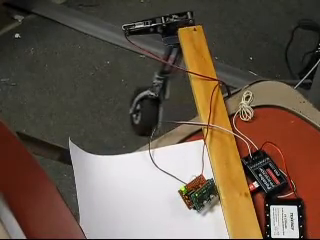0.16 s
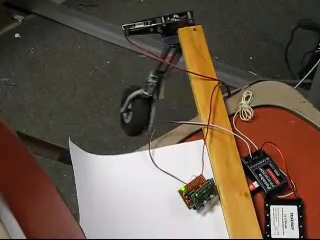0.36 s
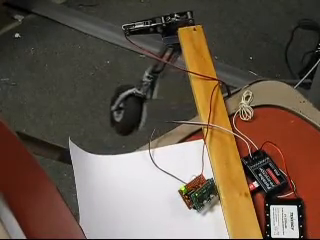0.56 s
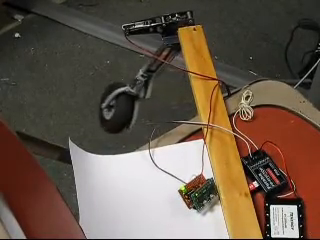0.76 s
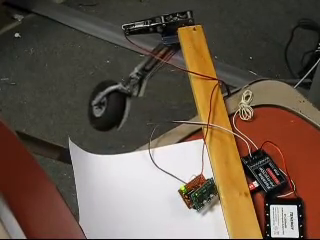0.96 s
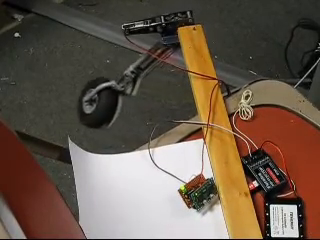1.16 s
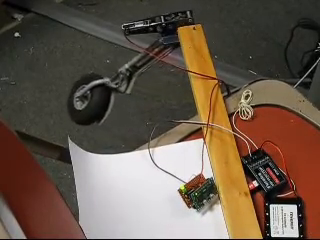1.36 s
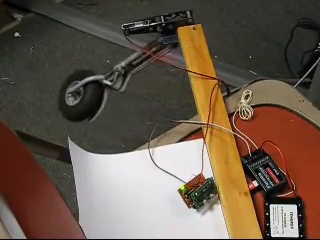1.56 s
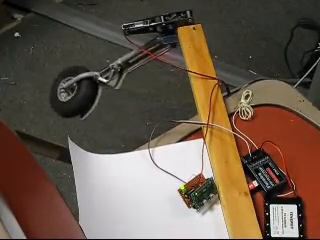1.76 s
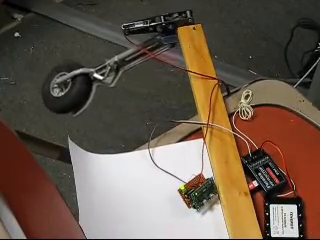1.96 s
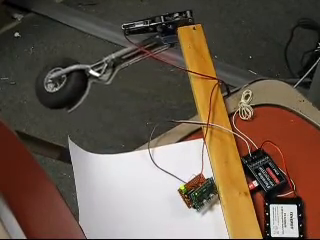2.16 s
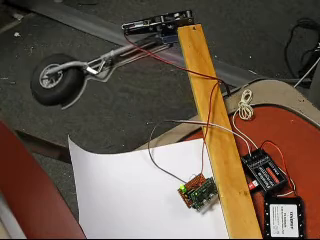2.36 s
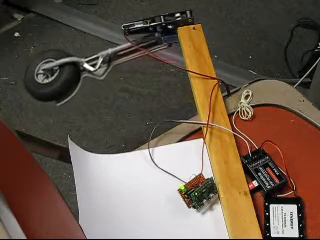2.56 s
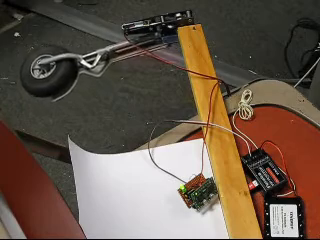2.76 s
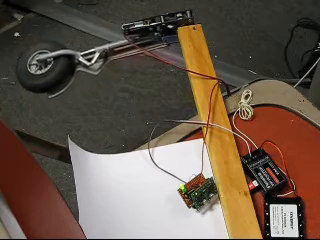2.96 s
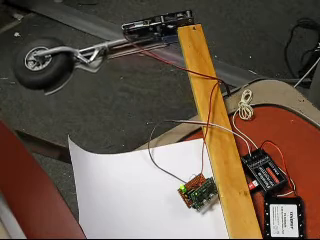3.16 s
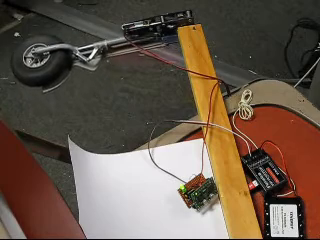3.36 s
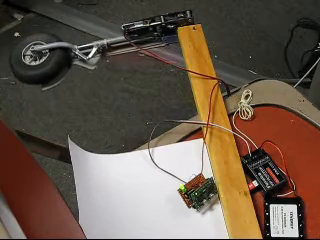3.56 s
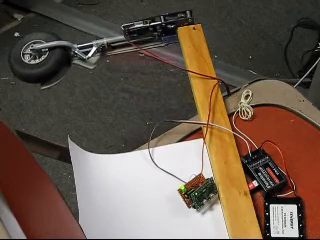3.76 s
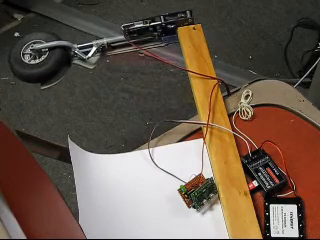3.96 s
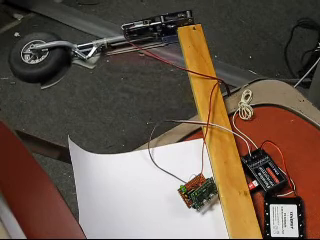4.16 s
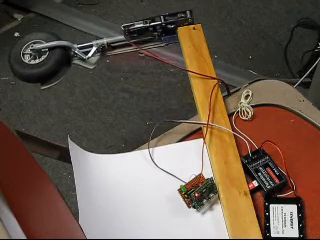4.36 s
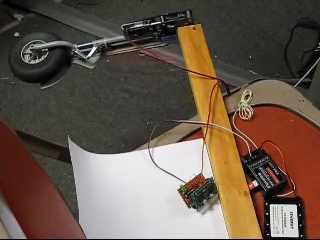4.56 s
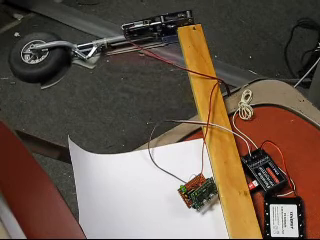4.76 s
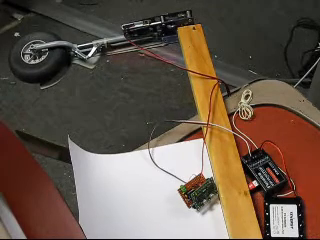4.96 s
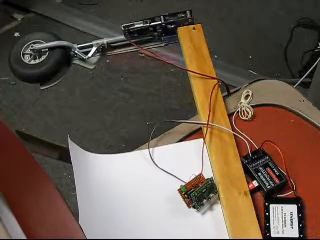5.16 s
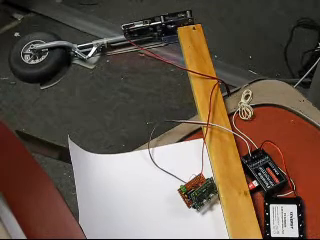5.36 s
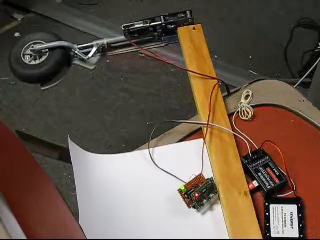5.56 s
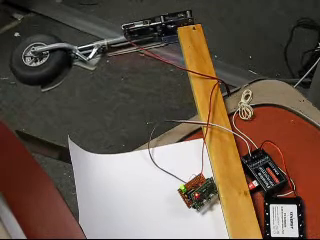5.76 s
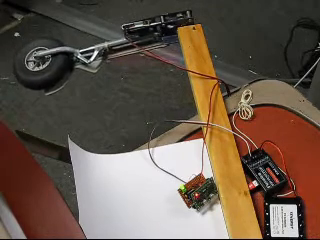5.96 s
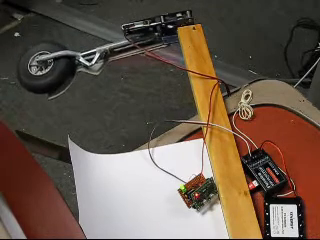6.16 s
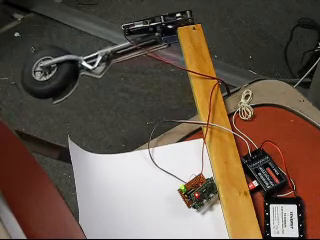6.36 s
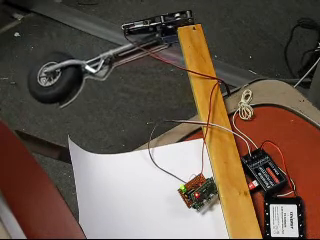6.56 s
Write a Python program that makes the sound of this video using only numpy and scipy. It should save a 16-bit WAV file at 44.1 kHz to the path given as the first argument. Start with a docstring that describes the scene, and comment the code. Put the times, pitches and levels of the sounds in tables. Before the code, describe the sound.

A small geared electric motor whines and grinds steadily, stops abruptly, kicks back with a clack, rests with faint ticks, then whirs again.

```python
"""A small geared electric motor winds a wheel strut up, stalls at the end stop, kicks back once, rests, winds it down.
Tooth and shaft tones follow one speed curve; rubbing noise throbs once a turn and rings housing, frame and can.
The rig ticks from the kick back on: bright cracks, ringing strut and plank.
Behind it a quiet workshop: room air, a far drone, mains hum. One close microphone, alike in both channels."""
import sys
import numpy as np
from scipy import signal
from scipy.fft import rfft, irfft, next_fast_len
from scipy.io import wavfile
from scipy.ndimage import uniform_filter1d, map_coordinates

SR = 44100
rng = np.random.default_rng(int(sys.argv[2]) if len(sys.argv) > 2 else 0)


def transcribe(signal):
    """Save signal, clipped to [-1, 1], as a 16-bit WAV file at the path in sys.argv[1]."""
    frames = np.atleast_2d(signal).T
    limited = np.clip(frames, -1, 1)
    pcm = np.round(limited * 32767).astype(np.int16)
    wavfile.write(sys.argv[1], SR, pcm)


N = 291942

TEETH = 7.417  # tooth contacts per shaft turn
REVERSE_S = 5.5  # the motor changes direction


def motor():
    """One shaft drives mesh whine, low tones, gear train, rubbing noise and housing ring."""
    mesh_hz, ring_db, grind_db, rasp_db, hiss_db, whine_db, shaft_db = controls()
    shaft = rotation(mesh_hz)
    dull_db = 17 * shaft["unsteady"]  # chattering or slowing gears carry little tone
    load_db = grind_db - dull_db
    tones = mesh_whine(shaft, whine_db, hiss_db) + can_whistle(shaft, ring_db)
    tones = tones + low_tones(shaft, shaft_db - dull_db, load_db) + gear_train(shaft, load_db)
    return tones + rubbing(shaft, grind_db, rasp_db, hiss_db) + housing_ring(shaft, ring_db)


# speed under load, raising: t/s, tooth-mesh rate f/Hz
RAISING_SPEED = [(0.0, 3647), (0.53, 3555), (0.58, 3505), (0.79, 3502), (1.32, 3376), (1.43, 3293),
                 (1.97, 3250), (2.12, 3183), (2.18, 3245), (2.27, 3194), (2.37, 3249), (2.84, 3293),
                 (3.1, 3338), (3.15, 3429), (3.39, 3490), (3.67, 3472), (3.75, 3622), (3.88, 3598)]
# speed under load, lowering: t/s, tooth-mesh rate f/Hz
LOWERING_SPEED = [(5.62, 3734), (5.66, 3696), (5.822, 3750), (5.898, 3904), (6.352, 3876), (6.522, 3777),
                  (6.62, 3776)]
# raising: t/s, control level/dB of housing ring, grind, rasp, hiss, mesh whine, shaft tone
RAISING_LEVELS = [(0, -37, -27.5, -38, -31, -35.5, -42), (.25, -29, -26, -35, -30, -30, -42.5),
                  (.52, -23.5, -27, -32, -29, -42.5, -47.5), (.65, -24, -25, -28.5, -29.5, -36.5, -42.5),
                  (.77, -23, -24, -28.5, -29, -34, -40.5), (.95, -19.5, -23, -29, -28.5, -37.5, -41),
                  (1.15, -25, -22.5, -28.5, -28, -31, -45.5), (1.35, -20.5, -23, -28, -28.5, -26.5, -37),
                  (1.55, -25, -24, -31.5, -27.5, -43, -39.5), (1.9, -23, -24, -31, -25.5, -33, -40),
                  (2.05, -17, -25.5, -30, -26, -33, -42), (2.35, -17.5, -25, -31, -27.5, -33, -42),
                  (2.55, -21, -24.5, -29.5, -29, -29.5, -44), (2.9, -16, -23.5, -28, -28, -35, -48.5),
                  (3.12, -12.5, -25, -30.5, -29.5, -38, -52.5), (3.4, -15, -24, -32, -30, -36.5, -47),
                  (3.63, -14, -23.5, -32.5, -30.5, -31.5, -44.5),
                  (3.885, -19.5, -23.5, -32.5, -28, -35, -47)]
# lowering: t/s, control level/dB of housing ring, grind, rasp, hiss, mesh whine, shaft tone
LOWERING_LEVELS = [(5.615, -21.5, -29.5, -34.5, -30, -38, -46), (5.689, -26, -27.5, -37, -33, -42, -50),
                   (5.745, -28, -30, -40, -34, -51, -47), (5.82, -19, -31.5, -42, -36.5, -46, -47.5),
                   (5.87, -42, -34.5, -47, -41, -54, -44), (5.92, -36, -30, -38.5, -35.5, -58, -43.5),
                   (6.12, -23, -28.5, -38, -34, -45, -43.5), (6.3, -17.5, -26, -37, -33, -47, -45),
                   (6.495, -21.5, -26.5, -34.5, -31.5, -41, -54.5),
                   (6.62, -12, -27.5, -35, -31.5, -40.5, -59)]
# kick back: t/s, tooth-mesh rate f/Hz, control level/dB of housing ring, grind, rasp, hiss
KICK_BACK = [(4.376, 300, -110, -110, -110, -110), (4.385, 600, -22.5, -31, -39, -36),
             (4.41, 1250, -19, -29, -32, -27), (4.426, 2257, -13, -17.5, -33.5, -26),
             (4.445, 3377, -11, -20.5, -39, -35), (4.46, 2884, -29, -24, -36.5, -46),
             (4.482, 2176, -31, -21.5, -41, -34), (4.51, 1200, -110, -110, -110, -110)]
# start downwards: t/s, tooth-mesh rate f/Hz, control level/dB of housing ring, grind, rasp, hiss
START_DOWN = [(5.508, 298.5, -110, -110, -110, -110), (5.522, 805, -41, -38, -31.5, -36),
              (5.55, 2287, -10, -19.5, -46, -46.5), (5.575, 3168, -40.5, -29.5, -40, -41.5),
              (5.602, 3720, -37.5, -28, -47, -40)]


def controls():
    """Mesh rate and six levels per sample: raising, braking at the end stop, kick, start, lowering."""
    brake_s, brake_hz_per_s = 3.893, 41000
    jolt_s, fade_s, dead_s = 0.0085, 0.044, 0.065  # after brake_s
    # over the running ring, grind, rasp, hiss, whine, shaft tone
    jolt_db, fade_db = (5, 0, 1, 8, 17.5, -5.5), (-5, -1.5, 1, -9, -6, -6)
    kick_whine_db, start_whine_db = -5, -16.5  # over the hiss
    jerk_shaft_db = -25.5  # over the grind
    jerks = np.array(KICK_BACK + START_DOWN)
    jerk_s, jerk_grind_db, jerk_hiss_db = jerks[:, 0], jerks[:, 3], jerks[:, 5]

    top_hz = RAISING_SPEED[-1][1]
    braking = [(brake_s, top_hz), (brake_s + dead_s, top_hz - brake_hz_per_s * dead_s)]
    mesh_hz, = curves(np.vstack([RAISING_SPEED, braking, jerks[:, :2], LOWERING_SPEED]))

    jerk_whine_db = jerk_hiss_db + np.where(jerk_s > REVERSE_S, start_whine_db, kick_whine_db)
    jerk_levels = np.column_stack([jerk_s, jerks[:, 2:], jerk_whine_db, jerk_grind_db + jerk_shaft_db])
    last_db = np.array(RAISING_LEVELS[-1][1:])
    braked = [(brake_s + jolt_s, *(last_db + jolt_db)),
              (brake_s + fade_s, *(last_db + fade_db)),
              (brake_s + dead_s, *(0 * last_db - 110))]
    return mesh_hz, *curves(np.vstack([RAISING_LEVELS, braked, jerk_levels, LOWERING_LEVELS]))


def rotation(mesh_hz):
    """Shaft phase in turns, integrated from the mesh rate, with the signals that mark unsteady running."""
    speedup = np.gradient(np.log(mesh_hz)) * SR / 6
    slack = np.clip(speedup, 0, 1)  # teeth chatter while the motor spins up
    slow = np.clip((3100 - mesh_hz) / 500, 0, 1)
    shiver = 0.002017 * wobble(40)  # the speed shivers slightly at random
    chatter = 0.0129 * slack * wobble(200)
    turn_hz = mesh_hz / TEETH
    return dict(turn_hz=turn_hz, turns=np.cumsum(turn_hz * (1 + shiver + chatter)) / SR, slack=slack,
                unsteady=np.maximum(np.clip(abs(speedup), 0, 1), slow),
                lowering=np.arange(N) / SR > REVERSE_S)


def tone(shaft, order, db, waver_db):
    """Sine at one order (cycles per turn), random phase, wavering level."""
    level_db = db + waver_db * wobble(25) + 7.4 * shaft["slack"] * wobble(180)
    return np.sqrt(2) * amp(level_db) * np.sin(2 * np.pi * (order * shaft["turns"] + rng.random()))


def by_direction(shaft, up_db, down_db):
    """Level before and after the reversal."""
    return np.where(shaft["lowering"], down_db, up_db)


# resonances that raise or lower mesh tones and low orders as they pass: f/Hz, width/Hz, gain/dB
TONE_RESONANCES = [(933.6, 51, 15), (1247, 44, 9.5), (1451, 36, 5), (1550, 65, 3.5), (2160, 40, 0),
                   (2264, 70, 5.5), (2367, 35, 8), (2646, 57, 5.5), (3085, 64, 7.5), (3136, 35, 5),
                   (3190, 80, 1), (3650, 73, 2), (6580, 280, 10), (7430, 59, 7), (8700, 300, -9),
                   (11520, 730, 16.5)]


def resonance_db(shaft, order):
    """Resonant gain at the tone's frequency; an unsteady tone passes too fast to be raised or lowered."""
    hz = order * shaft["turn_hz"]
    gain_db = sum(db / (1 + (2 * (hz - c) / w) ** 2) for c, w, db in TONE_RESONANCES)
    return (1 - shaft["unsteady"]) * gain_db


def resonant_tones(shaft, rows, db, waver_db, drift_db):
    """Tones with direction-dependent level, resonant gain and slow drift."""
    out = np.zeros(N)
    for order, up_db, down_db in rows:
        level_db = db + by_direction(shaft, up_db, down_db) + resonance_db(shaft, order)
        out += tone(shaft, order, level_db + drift_db * wobble(5.011), waver_db)
    return out


# mesh tones 1, 2: order/(cycles per turn), level/dB re whine before reversal, after
MESH_TONES = [(TEETH, 0, 0), (2 * TEETH, -5.5, -5)]
# mesh tone 3: order/(cycles per turn), level/dB re hiss before reversal, re whine after
THIRD_MESH_TONE = [(3 * TEETH, -12, -13.5)]


def mesh_whine(shaft, whine_db, hiss_db):
    """Tooth contacts sound at the mesh rate and its multiples; the 20th shaft order excites a mode."""
    first = resonant_tones(shaft, MESH_TONES[:1], whine_db, waver_db=3.0, drift_db=1.2)
    second_db = whine_db - 7 * shaft["unsteady"]
    second = resonant_tones(shaft, MESH_TONES[1:], second_db, waver_db=3.1, drift_db=1.85)
    third_db = by_direction(shaft, hiss_db, whine_db)
    third = resonant_tones(shaft, THIRD_MESH_TONE, third_db, waver_db=2.5, drift_db=1.96)
    mode = modes([(8680, 680, 0)])  # f/Hz, width/Hz, level/dB
    twentieth = ~shaft["lowering"] * tone(shaft, 20, hiss_db - 3, 2.1)
    return first + second + third + filtered(twentieth, lambda hz: mode(hz) ** 2)


def can_whistle(shaft, ring_db):
    """Order 1.5 x mesh crosses a mode of the can, before the reversal only."""
    whistle = tone(shaft, 1.5 * TEETH, ring_db - 21.5, 4.67) * ~shaft["lowering"] * (1 - shaft["slack"])
    return filtered(whistle, modes([(5167, 120, -1.9)]))  # f/Hz, width/Hz, level/dB


# shaft and second gear mesh: order/(cycles per turn), level/dB re load before reversal, after
LOW_TONES = [(2, -30.5, -17), (2.6, -15, -20), (3, -12.5, -8), (5, -17.5, -7.5), (5.19, -14.5, -37.5),
             (6, -14.5, -17.5), (7, -18.5, -26)]


def low_tones(shaft, shaft_db, load_db):
    """The once-per-turn tone, and low tones of the shaft and a second gear mesh, wavering."""
    low_orders = resonant_tones(shaft, LOW_TONES, load_db, waver_db=2.0, drift_db=1.47)
    return tone(shaft, 1, shaft_db, 1.79) + low_orders


# gear train: order/(cycles per turn), level/dB re load before reversal, after (ahead of the body)
TRAIN_ORDERS = [(0.754, -26, -29), (1.485, -20, -18), (2.39, -49, -11), (3.429, -5, -12),
                (3.663, -7, -18.5), (3.975, 1.5, -2), (4.46, -8, -28), (5.37, -13.5, -21.5),
                (6.402, -5.5, -30.5), (7.75, -14, -14.5), (8.05, -19, -34), (8.15, -16.5, -37),
                (8.3, -30.5, -38), (10.13, -9, -22), (10.56, -16, -14), (12.935, -16.5, -33.5),
                (12.67, -26.5, -42), (14.94, -22.5, -40), (16.91, -28, -30), (17.4, -23, -28),
                (19.12, -13, -20), (26.06, -25.5, -34.5)]


def gear_train(shaft, load_db):
    """Gear orders through frame and housing; a tone swells as it crosses a resonance."""
    train = sum(tone(shaft, order, load_db + by_direction(shaft, up_db, down_db), 3.4)
                for order, up_db, down_db in TRAIN_ORDERS)
    return filtered(train, lambda hz: amp(-5.5) * frame(hz) + amp(-1.5) * housing(hz))


# grind colour: f/Hz, relative density level/dB
GRIND_COLOUR = [(180, -48), (300, -29.5), (393, -46), (453, -13.5), (504, -28), (652, -16), (1340, -5.5),
                (1730, 3), (2140, -7), (2810, 0.5), (5000, -30.5), (6500, -56.5), (11000, -120)]
# rasp colour: f/Hz, relative density level/dB
RASP_COLOUR = [(3200, -16), (4000, 3), (5000, -1.5), (6200, 2.5), (7200, -19)]
# hiss colour: f/Hz, relative density level/dB
HISS_COLOUR = [(5500, -21), (6400, -4), (7600, 3), (9000, 1), (10500, -3), (11800, -1), (13000, -5)]


def rubbing(shaft, grind_db, rasp_db, hiss_db):
    """Patchy noise throbbing once a turn: grind rings the frame, rasp and hiss ring the can."""
    def rub(depth, colour, body):
        throb = 1 + depth * np.cos(2 * np.pi * shaft["turns"])
        return unit(filtered(throb * patchy(patchy_db=3.5), lambda hz: amp(along(colour, hz)) * body(hz)))

    grind = amp(grind_db - 3.0) * rub(0.98, GRIND_COLOUR, frame)
    rasp = amp(rasp_db - 2.5) * rub(0.394, RASP_COLOUR, can)
    hiss = amp(hiss_db - 3) * rub(0.365, HISS_COLOUR, can)
    return amp(1.28 * shaft["slack"] * wobble(150)) * (grind + rasp + hiss)


def housing_ring(shaft, ring_db):
    """Noise rings the housing; two orders pass its pitch and make it sing before the reversal."""
    ring = unit(filtered(rng.standard_normal(N), housing))
    sung = tone(shaft, TEETH / 2, ring_db - 3.5, 0.58) + tone(shaft, 4, ring_db - 2.5, 0.53)
    sung = sung * (1 - shaft["slack"]) * ~shaft["lowering"]
    return amp(ring_db - 9) * ring + filtered(sung, housing)


# gear housing modes: f/Hz, width/Hz, level/dB
HOUSING_MODES = [(1688.5, 64, -6.5), (1730.6, 36.7, 1.5), (1795, 21, -5), (1842, 22, -9.5)]


def housing(hz):
    """Modal response of the gear housing."""
    return modes(HOUSING_MODES)(hz)


# strut and plank modes: f/Hz, width/Hz, level/dB
FRAME_MODES = [(620, 77, -6), (966, 240, -12.5), (1223.4, 67, -6), (1523, 23, -35), (2310, 30, -27.5),
               (2670, 25, -3), (2804, 17.5, -26.5), (3256, 24, 4), (3301, 72, -2.5), (4136, 112, 5)]


def frame(hz):
    """Direct path plus modes of strut and plank."""
    return amp(-5) + modes(FRAME_MODES)(hz)


# metal motor can modes: f/Hz, width/Hz, level/dB
CAN_MODES = [(4340, 22, -6), (4550, 130, -4), (4999, 146, -5), (6000, 91, -34), (6580, 89, -3.5),
             (8040, 35, 5), (7935, 49, -2.5), (8800, 128, -16), (10310, 170, -17), (11710, 96, 1)]


def can(hz):
    """Direct path plus modes of the motor can."""
    return amp(-4.0) + modes(CAN_MODES)(hz)


def patchy(patchy_db):
    """Noise whose colour drifts in long narrow patches."""
    z = signal.stft(rng.standard_normal(N), nperseg=1024)[2]
    field = uniform_filter1d(rng.standard_normal(z.shape), size=4, axis=0)  # across frequency
    field = uniform_filter1d(field, size=24, axis=1)  # along time
    return signal.istft(z * amp(patchy_db * unit(field)), nperseg=1024)[1][:N]


# rig contacts: t/s, level/dB, added crack level/dB, added level/dB of ring below 1 kHz
RIG_TICKS = [(4.4857, -7, -9, -12.5), (4.522, -17, -15, -9), (4.539, -32, -21, -13.5),
             (5.088, -52, 17.5, 4), (5.0948, -29, 5, -18.5), (5.1294, -30, -20, -4),
             (5.1474, -29.5, -25, -20), (5.1541, -26, -5.5, -7), (5.1904, -29, -25, 1.5),
             (5.1974, -41, -19, 5), (5.5144, -18, 7, -28), (5.5182, -9, 9.5, -24),
             (5.5367, -11, -19, -11.5), (5.8217, -21, -22, -5), (5.904, -17, -14, -3.5),
             (5.9284, -17.5, -2, -11.5)]
# strut and plank ring: f/Hz, relative level/dB, t60/s
KNOCK_MODES = [(227.07, -13.5, 0.038), (620, 5, 0.034), (828, 6.5, 0.046), (1239, -11.5, 0.075),
               (1688, 2, 0.0378), (2050, -10.5, 0.027), (2380, 5, 0.012), (2730, -1, 0.014),
               (3130, -13.5, 0.052), (4170, -24, 0.051)]


def ticks():
    """Each contact is a bright crack that rings the strut above and the plank below."""
    out, t = np.zeros(N + SR), np.arange(SR // 5) / SR

    def band(lo_hz, hi_hz):
        sos = signal.butter(2, (lo_hz, hi_hz), "band", fs=SR, output="sos")
        return signal.sosfilt(sos, rng.standard_normal(len(t)))

    for s, db, treble_db, knock_db in RIG_TICKS:
        ring = np.zeros(len(t))
        for hz, mode_db, t60 in KNOCK_MODES:
            level_db = mode_db + (knock_db if hz < 1000 else 0) + rng.normal(0, 5.4)
            ring += amp(level_db - 60 * t / t60) * np.sin(2 * np.pi * hz * t)
        puff = amp(4 - 60 * t / 0.024) * band(655, 3830)
        crack = amp(treble_db + 1.5 - 60 * t / 0.0077) * band(4920, 8200)
        onset = 1 - np.exp(-t / 0.0016)
        out[round(s * SR):][:len(t)] += amp(db) * ((amp(-6) * ring + puff) * onset + crack)
    return out[:N]


# room decay: f/Hz, t60/s
ROOM_DECAY = [(300, 0.28), (1750, 0.16), (3200, 0.32), (10000, 0.27)]


def room(x):
    """Convolution with a noise tail; each frequency dies at its own speed."""
    hz, t, z = signal.stft(rng.standard_normal(SR // 2), SR, nperseg=256)
    tail = signal.istft(z * amp(-60 * t / along(ROOM_DECAY, hz)[:, None]), SR, nperseg=256)[1]
    delayed = np.pad(x, (300, 0))  # samples
    return signal.fftconvolve(delayed, tail / np.linalg.norm(tail))[:N]


# room air colour: f/Hz, relative density level/dB
AIR_COLOUR = [(15, -43), (25, -15), (123, -9), (148, -11.5), (183, -3), (208, -8.5), (231, -4), (325, -8),
              (422, -9), (770, -7.5), (855, 3), (925, -5.5), (1730, -6.5), (2080, -12.5), (13000, -25.5)]
# far machine drone: f/Hz, width/Hz, level/dB
DRONE_MODES = [(644, 51, 7), (868, 126, 1), (1707.7, 69, -4)]
# mains hum: f/Hz, mean level/dB
MAINS_TONES = [(118.4, -64), (177.6, -68), (242.2, -68)]


def workshop():
    """Coloured noise for room air, resonant noise for a far drone, wavering sines for mains hum."""
    air_db = -43 - 2.5 + 0.35 * wobble(4.183)
    drone_db = -43 - 7.5 + 0.7 * wobble(6)
    air = unit(filtered(rng.standard_normal(N), lambda hz: amp(along(AIR_COLOUR, hz))))
    drone = unit(filtered(rng.standard_normal(N), modes(DRONE_MODES)))
    t = np.arange(N) / SR
    hum = sum(np.sqrt(2) * amp(db + 1.33 * wobble(3.6)) * np.sin(2 * np.pi * hz * t) for hz, db in MAINS_TONES)
    return amp(air_db) * air + amp(drone_db) * drone + hum


def amp(db):
    """Gain of a level in dB."""
    return 10 ** (np.asarray(db) / 20)


def unit(x):
    """x at rms 1."""
    return x / np.sqrt(np.mean(x ** 2) + 1e-20)


def along(points, hz):
    """(Hz, value) points interpolated on a log axis."""
    f, v = np.transpose(points)
    return np.interp(np.log(hz + 1), np.log(f + 1), v)


def curves(rows):
    """One value per sample for each column after the time."""
    s, *cols = np.transpose(rows)
    return [np.interp(np.arange(N) / SR, s, c) for c in cols]


def wobble(rate):
    """A smooth random curve, rate knots a second."""
    return map_coordinates(rng.standard_normal(int(N * rate / SR) + 4), [np.arange(N) * rate / SR])


def filtered(x, response):
    """x times a complex response of frequency."""
    m = next_fast_len(N + SR // 2)
    return irfft(rfft(x, m) * response(np.fft.rfftfreq(m, 1 / SR)), m)[..., :N]


def modes(table):
    """Causal response of (Hz, width Hz, dB) resonances, alternating in sign."""
    def response(f):
        return sum((-1) ** k * amp(db) * 1j * f * w / (c * c - f * f + 1j * f * w)
                   for k, (c, w, db) in enumerate(table))
    return response


def scene():
    """The rig, its room and the workshop, alike in both channels."""
    rig = motor() + ticks()
    return np.tile(rig + amp(-11.0) * room(rig) + workshop(), (2, 1))


def record(dry):
    """The microphone drops the deepest bass (two 28 Hz poles); nothing passes above the band limit."""
    top_hz = 12780
    return filtered(dry, lambda hz: (1j * hz / (28 + 1j * hz)) ** 2 * (hz < top_hz))


dry = scene()
out = record(dry)
transcribe(out)
```